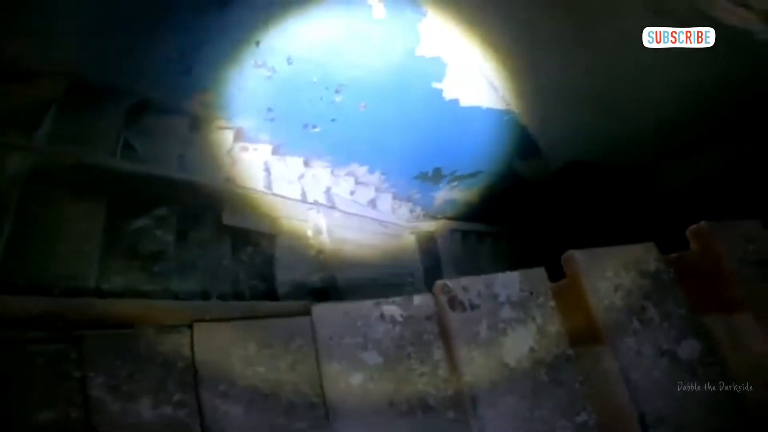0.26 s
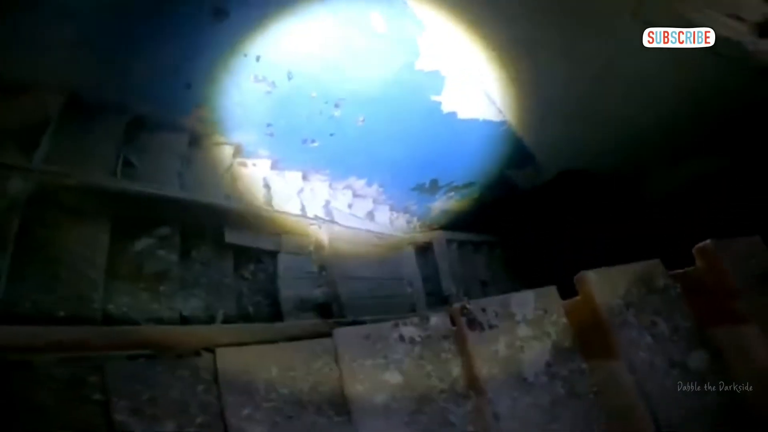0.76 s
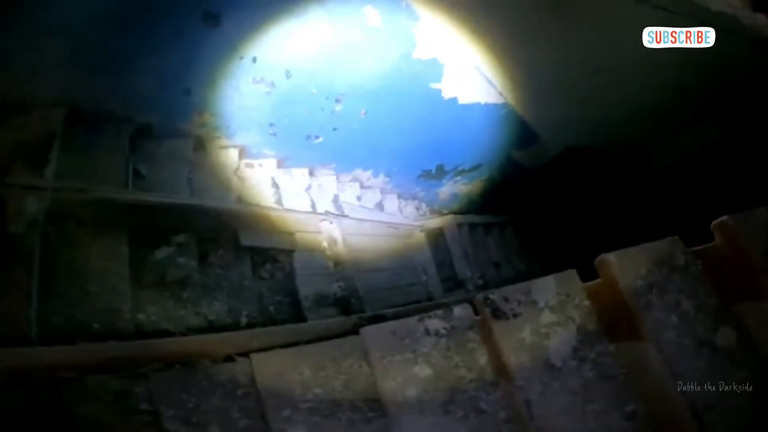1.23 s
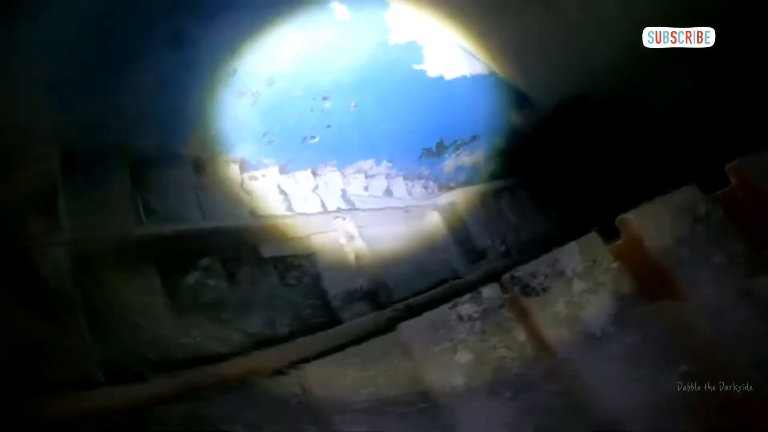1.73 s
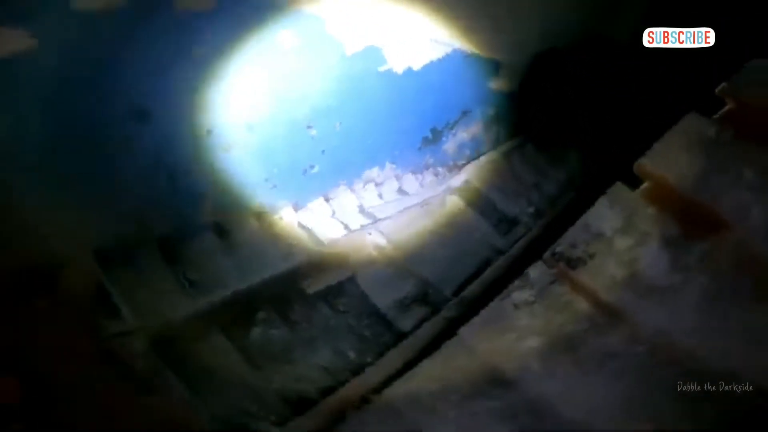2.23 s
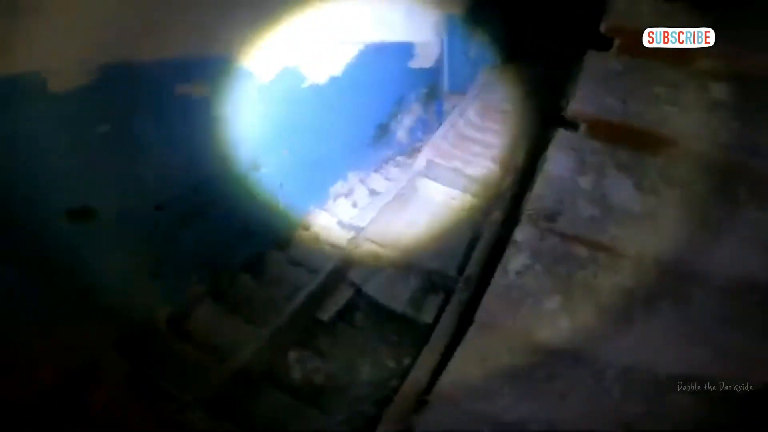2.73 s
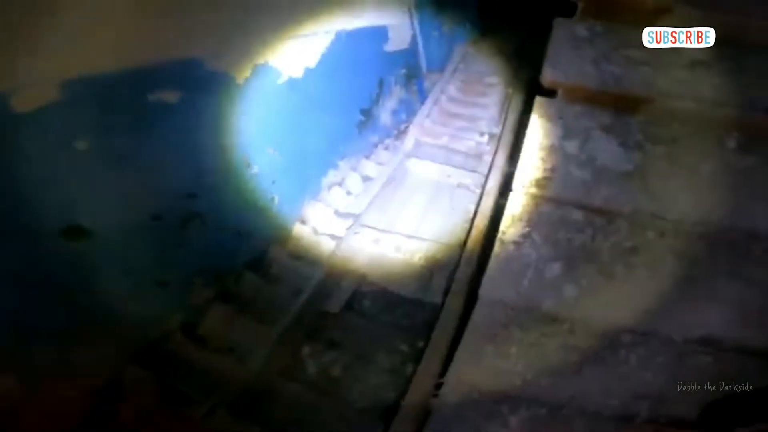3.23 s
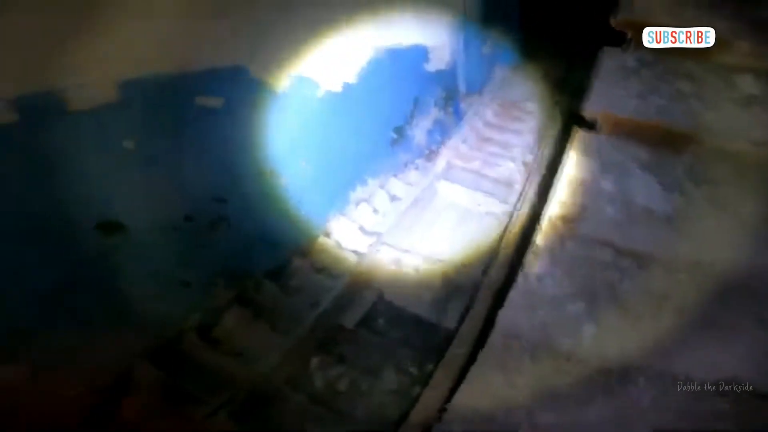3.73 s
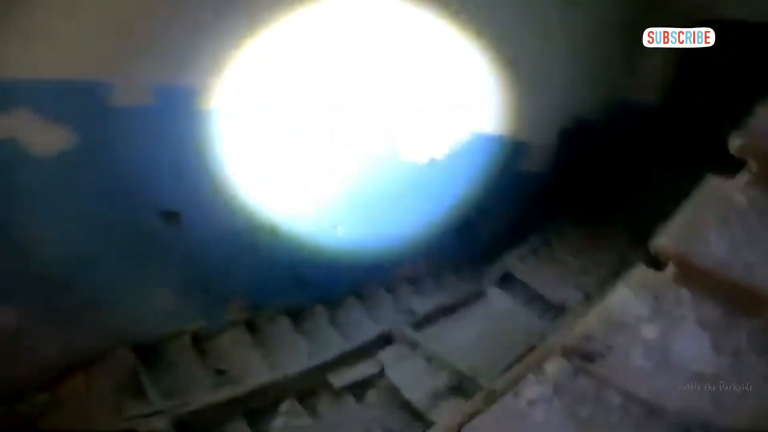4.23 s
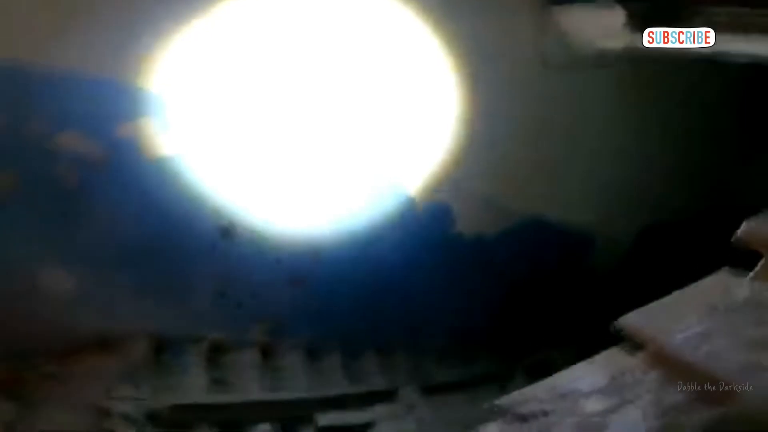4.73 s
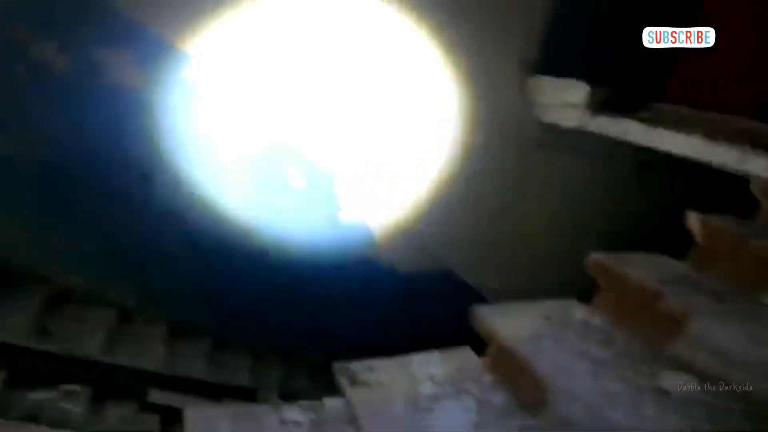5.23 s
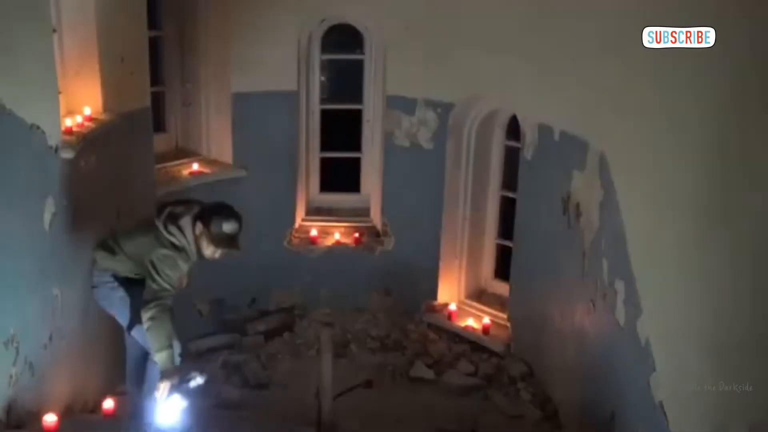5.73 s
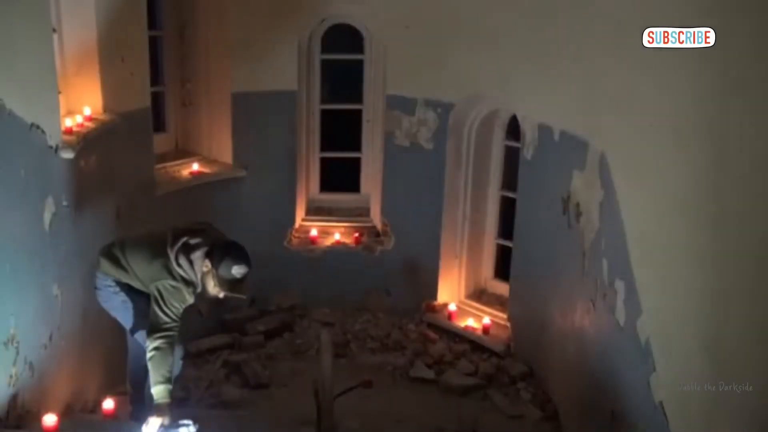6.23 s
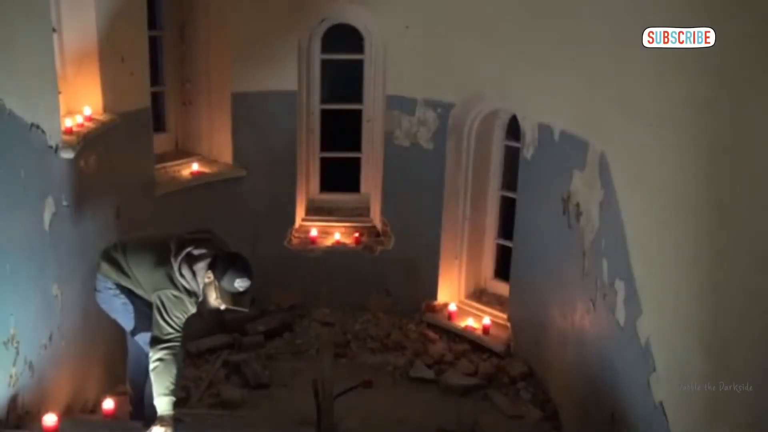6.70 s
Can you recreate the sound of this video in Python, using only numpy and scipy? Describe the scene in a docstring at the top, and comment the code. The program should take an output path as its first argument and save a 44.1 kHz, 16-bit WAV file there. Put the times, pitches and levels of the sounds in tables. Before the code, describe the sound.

Someone walks carefully over plaster and brick debris, with a handheld camera picking up dull body thumps. The start is hushed, with stony clacks and thin airy whistles; the middle becomes busy with brittle snaps, grating and a strong gritty skid with a short stairwell reverb. After a quieter gap, very loud distorted handling blows, metallic chatter and rubbing finish abruptly close to the microphone.

```python
"""Still air hums faintly in a bare ruined stairwell as soles rub over dust and faint whistling tones glide.
Someone carrying a camera picks a way over rubble: brick clacks, footfalls thump through the camera body,
grit snaps, short hollow knocks sound; a sole grates on plaster, the camera sways, then a sole slides.
At the end heavy bumps jolt the camera: a metal fitting rattles, a hand drags, judders and catches on the
shell, and the microphone overloads. Sources are shaped noise, random fractures and decaying modes."""
import sys
import numpy as np
from scipy import signal
from scipy.fft import rfft, irfft, next_fast_len
from scipy.io import wavfile
from scipy.ndimage import uniform_filter1d

SR = 44100
rng = np.random.default_rng(int(sys.argv[2]) if len(sys.argv) > 2 else 0)


def generate_wav(sig):
    """Save sig (samples, or channels by samples) to the path in sys.argv[1] as 16-bit PCM at SR."""
    pcm = np.round(np.clip(np.atleast_2d(sig).T, -1, 1) * 32767).astype(np.int16)
    wavfile.write(sys.argv[1], SR, pcm)


N = 306936
TIME = np.arange(N) / SR  # the whole scene [s]
HIT = np.arange(SR // 2) / SR  # a single hit [s]


def amp(db):
    """Level definition: decibels to amplitude gain."""
    return np.exp(np.asarray(db) * np.log(10) / 20)


def unit(x):
    """Power normalization: scales to rms 1."""
    return x / np.sqrt(np.mean(x ** 2) + 1e-20)


def crest(x):
    """Short-time power normalization: the loudest 3 ms of a hit get rms 1."""
    power = uniform_filter1d(x ** 2, size=132, mode="constant")
    return x / np.sqrt(power.max() + 1e-20)


def read(points, hz):
    """Interpolation of a spectrum along a log-frequency axis."""
    f, value = np.transpose(points)
    return np.interp(np.log(hz + 1), np.log(f + 1), value)


def add(mix, s, sound):
    """Superposition: mixes a sound in at time s."""
    part = mix[max(round(s * SR), 0):][:len(sound)]
    part += sound[:len(part)]


def colour(x, points):
    """Minimum-phase filtering: a causal filter whose phase follows from the log gain."""
    size = next_fast_len(len(x) + SR // 10)
    hz = abs(np.fft.fftfreq(size, 1 / SR))
    log_gain = np.log(amp(np.maximum(read(points, hz), -100)))
    response = np.exp(np.conj(signal.hilbert(log_gain)))[:size // 2 + 1]
    return irfft(rfft(x, size) * response, size)[:len(x)]


def dying(t60):
    """Exponential damping: falls 60 dB in t60, at least 1 ms."""
    return np.exp(-np.log(1000) * HIT / max(t60, 1e-3))


def swell(s, hold_s, rise_s, fall_s):
    """Exponential growth and decay: full from s for hold_s; rise_s and fall_s each cover 20 dB."""
    early = np.maximum(s - TIME, 0) / max(rise_s, 1e-3)
    late = np.maximum(TIME - s - hold_s, 0) / max(fall_s, 1e-3)
    return 10 ** -np.minimum(early + late, 10)


def burst(t60):
    """Damped random excitation: a puff of noise that dies away."""
    return rng.standard_normal(len(HIT)) * dying(t60)


def waver(length, size):
    """Slow random modulation of rms 1, smoothed twice over size samples."""
    smooth = uniform_filter1d(rng.standard_normal(length), size)
    return unit(uniform_filter1d(smooth, size))


def ring(x, hz, q):
    """Resonance: one peak filter, pitch capped at a third of the sample rate, q raised for high pitches."""
    hz = min(hz, SR / 3)
    return signal.lfilter(*signal.iirpeak(hz, max(q, 3 * hz / SR), fs=SR), x)


def patchy(x, depth_db):
    """Spectral modulation: patches of the spectrum grow and fade at random."""
    z = signal.stft(x, nperseg=512)[2]
    across_pitch = uniform_filter1d(rng.standard_normal(z.shape), size=7, axis=0)
    patches = unit(uniform_filter1d(across_pitch, size=12, axis=1))
    return unit(signal.istft(z * amp(depth_db * patches))[1][:N])


def grains(per_s, spread_db, dust):
    """Random fracture: tiny impulses of uneven size over a smooth hiss of dust."""
    size = amp(spread_db * np.minimum(rng.exponential(1, N), 4))
    clicks = size * rng.choice([-1, 1], N) * (rng.random(N) < per_s / SR)
    return unit(clicks) + dust * rng.standard_normal(N)


def chips(per_s, spread_db, q, count=18):
    """Random fracture with resonance: uneven fragments crack at random over a row of pitches."""
    out = np.zeros(N)
    for hz in np.geomspace(500, 13000, count):
        draw = rng.random(N) * SR * count / per_s
        at = np.flatnonzero(draw < 1)
        clicks = np.zeros(N)
        clicks[at] = amp(spread_db * np.minimum(-np.log(draw[at]), 4))
        out += ring(clicks, hz, q)
    return unit(out)


def glides(rows, fringe=1.6, fringe_db=-11):
    """Frequency-shifted narrow-band noise: hiss swells, glides and fades; pitch and level flutter."""
    flutter_share, flutter_db = 0.25, 1  # pitch flutter as a share of the band width; level flutter
    out = np.zeros(N)
    for s, length, first_hz, last_hz, width_hz, db in rows:
        part = np.minimum(TIME[:SR] / length, 1)
        noise = rng.standard_normal(SR) + 1j * rng.standard_normal(SR)
        hz = first_hz + (last_hz - first_hz) * part
        hz = hz + flutter_share * width_hz * waver(SR, size=900)
        core, halo = (signal.lfilter(*signal.butter(2, w, fs=SR), noise) / np.sqrt(w)
                      for w in (width_hz, fringe * width_hz))
        carrier = np.exp(2j * np.pi * np.cumsum(hz) / SR)
        hiss = ((core + amp(fringe_db) * halo) * carrier).real
        hiss = unit(hiss * amp(flutter_db * waver(SR, size=800)))
        envelope = np.sqrt(abs(np.sin(np.pi * part))) * (1 - part / 2)
        add(out, s, amp(db) * envelope * hiss)
    return out


# spectrum of the hush: (frequency [Hz], level [dB])
AIR_COLOUR = [(12, -65), (20, 3), (58, -1.5), (112, -21.5), (180, -11.5), (289, -13), (452, -18),
              (767, -23), (1270, -16.5), (2540, -27), (5380, -24), (7730, -29.5), (15500, -52.5)]


def air():
    """Background noise and cavity resonance: a wavering hush with a low hollow tone."""
    hush = patchy(colour(rng.standard_normal(N), AIR_COLOUR), depth_db=1.5)
    hollow = unit(ring(ring(rng.standard_normal(N), hz=171, q=1.77), hz=171, q=1.77))
    hollow *= amp(2 * waver(N, size=3500))
    return amp(-55.5) * hush + amp(-57.5) * hollow


# strokes of a sole over dust and grit:
# (peak time [s], rise per 20 dB [s], fall per 20 dB [s], coarse rub level [dB], fine grit level [dB])
STROKES = [(0.02, 0.38, 0.36, -51.5, -56), (2.23, 0.011, 0.34, -45, -44), (2.67, 0.0067, 0.41, -63, -53),
           (3.9, 0.18, 0.8, -49.5, -49.5), (4.07, 0.39, 0.11, -52, -51.5), (4.19, 0.19, 0.13, -69, -39.5),
           (4.68, 0.16, 0.11, -50, -47), (4.87, 0.8, 0.29, -41.5, -50), (5.021, 0.21, 0.93, -41, -45.5),
           (5.43, 0.13, 0.47, -51, -53), (5.698, 0.078, 0.11, -42, -42.5), (6.05, 0.3, 0.37, -53, -57.5),
           (6.341, 0.43, 0.36, -52, -56.5)]
# spectrum of the coarse rub: (frequency [Hz], level [dB])
RUB_COLOUR = [(120, -58), (200, 0), (377, -7), (580, -7.5), (842, -11), (1190, -2), (2020, -7.5),
              (3500, -20.5), (4550, -39), (7700, -120)]
# spectrum of the fine grit: (frequency [Hz], level [dB])
GRIT_COLOUR = [(1290, -17), (2200, -1.5), (4600, 0), (5820, -4), (7500, -4), (9700, -13), (10800, -14.5),
               (15500, -26)]
# plaster crushed to powder: (peak time [s], rise per 20 dB [s], fall per 20 dB [s], level [dB])
POWDER_HISSES = [(4.19, 0.23, 0.16, -62), (5.708, 0.055, 0.041, -48.5)]


def shuffles():
    """Sliding friction: soles rub over dust, fine grit crackles under them and crushed powder hisses."""
    rub = unit(colour(rng.standard_normal(N), RUB_COLOUR))
    grit = patchy(colour(grains(per_s=900, spread_db=4.2, dust=1.1), GRIT_COLOUR), depth_db=1.5)
    rub_power, grit_power = np.zeros((2, N))
    for s, rise_s, fall_s, rub_db, grit_db in STROKES:
        stroke = swell(s, 0, rise_s, fall_s)
        rub_power += (amp(rub_db) * stroke) ** 2
        grit_power += (amp(grit_db) * stroke) ** 2
    fizz = unit(ring(ring(rng.standard_normal(N), hz=9400, q=1.2), hz=9400, q=1.2))
    powder = sum(amp(db) * swell(s, 0, rise_s, fall_s) for s, rise_s, fall_s, db in POWDER_HISSES)
    return rub * np.sqrt(rub_power) + grit * np.sqrt(grit_power) + powder * fizz


# faint thin whistling tones, level before the swell and fade:
# (time [s], length [s], first pitch [Hz], last pitch [Hz], band width [Hz], level [dB])
WHISTLE_GLIDES = [(.22, 0.44, 7330, 7050, 129, -68), (.73, 0.2, 6220, 5300, 282, -59.5),
                  (.86, 0.24, 5900, 5760, 170, -61), (0.99, 0.15, 5580, 5230, 120, -52.5),
                  (1.05, 0.14, 5420, 4420, 230, -50.5), (1.16, 0.31, 3970, 3740, 170, -53),
                  (1.34, 0.42, 3330, 3180, 70, -55), (1.38, 0.5, 4350, 4530, 149, -61),
                  (1.89, 0.19, 5150, 4950, 262, -59), (2.01, 0.68, 5430, 5650, 145, -56.5),
                  (2.42, 0.18, 4170, 4000, 110, -55), (2.415, 0.12, 3700, 3400, 190, -51.5),
                  (2.88, 0.28, 4460, 4240, 100, -61), (3.19, 0.21, 2900, 3200, 119, -61),
                  (3.204, 0.26, 4630, 4980, 548, -58), (5.6, 0.29, 5180, 4970, 200, -54)]


def whistles():
    """Narrow-band noise: faint thin whistling tones glide and fade."""
    return glides(WHISTLE_GLIDES)


# brick pieces clacking some way off: (time [s], level [dB])
BRICK_CLACKS = [(1.223, -34.5), (1.261, -36), (1.369, -35.5), (1.477, -34), (2.225, -33), (2.3, -35),
                (2.969, -32), (3.031, -34.5), (3.066, -43)]
# spectrum of a clack: (frequency [Hz], level [dB])
BRICK_COLOUR = [(120, -24), (200, -6.5), (570, 0), (818, -2.5), (1110, -5), (1850, -6), (2170, -3),
                (3010, -9), (3350, -6), (5450, -12), (7550, -9), (8260, -16.5), (13000, -20), (15000, -28)]


def clacks():
    """Impact: brick tips onto brick with a burst of contact, a short stony resonance and settling crumbs."""
    out = np.zeros(N)
    loose = grains(per_s=110, spread_db=2.5, dust=.35)
    for s, db in BRICK_CLACKS:
        crumbs = amp(-14.5) * loose[rng.integers(N - len(HIT)):][:len(HIT)] * dying(t60=0.64)
        contact = burst(t60=0.057) * (1 - np.exp(-HIT / 0.00069))
        contact = contact + 2.85 * ring(contact, hz=1120 * rng.uniform(1.0, 1.03), q=5.6)
        contact += colour(crumbs, [(400, 3.5), (1300, -1), (3500, -28.0)])
        add(out, s, amp(db) * crest(colour(contact, BRICK_COLOUR)))
    return out


# footfalls that reach the camera body: (time [s], peak level [dB], length of the push [s])
FOOTFALLS = [(2.288, -23.5, 0.0013), (2.299, -25.5, 0.016), (3.174, -24, 0.0021), (4.135, -30.5, 0.0023),
             (4.276, -13.5, 0.0091), (4.546, -28, 0.0023), (4.604, -19, 0.00089), (4.611, -14.5, 0.0066),
             (4.657, -13.5, 0.0031), (4.687, -14, 0.011), (4.823, -19.5, 0.013), (5.041, -16.5, 0.0081),
             (5.267, -25, 0.00088), (5.666, -23.5, 0.0008), (5.737, -27, 0.014), (6.128, -22.5, 0.015),
             (6.255, -23, 0.014)]
# low modes of the camera body: (frequency [Hz], level [dB], t60 [s])
BODY_MODES = [(45.2, -6, 0.49), (75.8, 6.5, 0.22), (129, 0.5, 0.24), (233, 2, 0.03), (301, 2, 0.094),
              (610, -8, 0.065)]


def thumps():
    """Modal excitation: a smooth push rings the camera body; shorter pushes sound harder."""
    out = np.zeros(N)
    modes = sum(amp(mode_db) * dying(t60) * np.cos(2 * np.pi * hz * HIT)
                for hz, mode_db, t60 in BODY_MODES)
    for s, db, push_s in FOOTFALLS:
        u = HIT / (max(push_s, 1e-3) / 4)
        thump = signal.fftconvolve(-u * np.exp(-u), modes)[:len(HIT)]
        add(out, s, amp(db) * thump / abs(thump).max())
    return out


# grit snapping close by, splinter treble relative to the main crack:
# (time [s], level [dB], pitch [Hz], band width [octaves], splinter treble [dB])
GRIT_SNAPS = [(2.3018, -33.5, 4400, 0.65, -18), (2.3795, -27, 3970, 0.79, -32),
              (2.6656, -36.5, 3470, 1.25, -26), (3.9899, -34.5, 4200, 1, -5),
              (4.0753, -33, 3270, 0.83, -24), (4.139, -28, 5950, 0.73, -20), (4.1655, -41, 4060, 1.1, -16),
              (4.1792, -33.5, 3850, 1.5, -13), (4.1882, -33.5, 2600, 1.9, -9),
              (4.2042, -29, 4630, 0.96, -6), (4.208, -31, 4550, .9, -3), (4.233, -35, 3600, 1.3, -18),
              (4.2672, -15, 3760, 0.65, -8), (4.268, -18.5, 1850, 0.42, -35), (4.2922, -40, 9400, .6, -20),
              (4.6026, -24, 1950, 0.29, -4), (4.651, -38.5, 3960, 1.3, -3), (4.6668, -34, 2960, 0.75, -6),
              (4.675, -30, 1420, 1, -28), (4.7232, -31.5, 1890, 0.71, -16), (4.7889, -24, 1430, 1.1, -11.5),
              (4.975, -33, 2940, 0.84, 14), (4.9878, -32.5, 2570, 0.81, 5), (5.0288, -22.5, 3300, 0.82, 7),
              (5.033, -23.5, 2090, 1.2, -14), (5.037, -29, 9000, 0.55, -8), (5.1, -22.5, 3400, 1.2, -9),
              (5.1363, -23.5, 4600, 1.1, -11), (6.0713, -40.5, 2260, 0.97, -20)]


def snaps(fracture_s=0.000901):
    """Brittle fracture: plaster creaks briefly, then cracks in a band of its own with tiny splinters."""
    out = np.zeros(N)
    for s, db, hz, octaves, treble_db in GRIT_SNAPS:
        crack = burst(t60=0.0091) * (1 - np.exp(-HIT / 0.00047))
        crack = crack[:SR // 20]
        add(crack, fracture_s, np.array([6.]))  # the break itself
        half = 2 ** (np.clip(octaves, .1, 3) / 2)
        band = [hz / half, min(hz * half, SR / 3)]
        body = signal.lfilter(*signal.butter(2, band, "band", fs=SR), crack)
        splinters = colour(crack, [(500, -3), (4000, 5.5), (9000, 7.0), (15000, -8.5)])
        add(out, s, amp(db) * crest(crest(body) + amp(treble_db) * crest(splinters)))
    return out


# short hollow knocks, some under a snap or a camera blow:
# (time [s], level [dB], pitch [Hz], room share [dB])
HOLLOW_KNOCKS = [(2.888, -42.5, 342, -22), (4.268, -24, 950, -27), (4.6035, -34.5, 696, -25),
                 (4.766, -29.5, 1090, 5.5), (4.776, -24, 1230, -2), (4.789, -21.5, 1250, -4.5),
                 (4.799, -25.5, 1120, -2), (5.479, -27, 1180, -13), (5.493, -26, 1280, -5.5),
                 (5.639, -26, 1420, -7.5), (5.643, -30, 546, -7), (5.69, -32, 632, -2.5),
                 (5.835, -39, 1130, -2), (6.52, -13.5, 1450, -15), (6.531, -16.5, 1550, -16)]


def knocks():
    """Impact and resonance: a tap and short ringing noise. Returns direct sound and room send."""
    out, sent = np.zeros((2, N))
    for s, db, hz, wet_db in HOLLOW_KNOCKS:
        blow = burst(t60=0.033)
        add(blow, .001, np.array([7.]))  # the tap
        tone = ring(blow, hz, q=5.5) + 0.22 * ring(blow, hz=1500, q=28) + 0.18 * ring(blow, hz=644, q=1.8)
        body = colour(tone, [(150, 9.5), (400, 0.0), (1900, -4.0), (3200, -11.5), (8000, -13), (15000, -33)])
        knock = amp(db) * crest(body)
        add(out, s, knock)
        add(sent, s, amp(wet_db) * knock)
    return out, sent


# the edge of a sole on plaster, level before the swell and fade:
# (time [s], length [s], first pitch [Hz], last pitch [Hz], band width [Hz], level [dB])
SOLE_GRATES = [(3.95, 0.2, 1154, 1365, 149, -48.5), (4.03, 0.18, 1500, 2000, 264, -48),
               (4.04, 0.09, 2610, 2530, 100, -48), (5.06, 0.17, 2396, 1101, 326, -30.5)]


def grates():
    """Frictional excitation: a sole edge grates over plaster, its pitch moving with the stroke."""
    return glides(SOLE_GRATES)


# spectrum of the sway: (frequency [Hz], level [dB])
SWAY_RUMBLE = [(12, -52), (20, 5.5), (52, 0), (102, -11), (348, -18.5), (650, -35.5), (1100, -120)]


def sway():
    """Low-frequency vibration: rumble of the carried camera builds up and dies down with the walk."""
    level = amp(-38) * swell(4.65, hold_s=0.5, rise_s=0.35, fall_s=1.68)
    return level * unit(colour(rng.standard_normal(N), SWAY_RUMBLE))


# spectrum of the crushed grains: (frequency [Hz], level [dB])
SLIDE_CRUSH = [(120, -31), (200, -3), (278, -3), (544, -1.5), (783, -1.5), (2150, 0.5), (3070, -3),
               (4580, -3), (5800, -5), (9800, -3), (11000, -14), (15000, -25)]


def slide(start_s=5.029, bite_s=0.0024, press_s=5.087, press_db_per_s=68):
    """Crushing friction: a sole bites, presses to full weight and eases; fine grit fades first."""
    coarse = chips(per_s=1200, spread_db=2.4, q=7)
    crush = colour(unit(grains(per_s=3600, spread_db=3, dust=0.2)) + 1.3 * coarse, SLIDE_CRUSH)
    crush *= amp(1.7 * waver(N, size=110))  # uneven surges
    fine = signal.sosfiltfilt(signal.butter(2, 5500, "high", fs=SR, output="sos"), crush)
    weight = amp(-press_db_per_s * np.maximum(press_s - TIME, 0))
    coarse_level = amp(-27) * swell(start_s, hold_s=0.16, rise_s=bite_s, fall_s=0.092)
    fine_level = amp(-29.5) * swell(start_s, hold_s=0.083, rise_s=bite_s, fall_s=0.11)
    return weight * (coarse_level * unit(crush - fine) + fine_level * unit(fine))


# the camera is jostled: (time [s], length [s], level [dB])
CAMERA_JOSTLES = [(6.521, 0.089, -14), (6.748, 0.04, -12.5), (6.855, 0.063, -11)]
# spectrum of the jostling: (frequency [Hz], level [dB])
JOSTLE_BUMPS = [(15, -33), (25, -11), (42, 4), (97, 0.5), (192, -7.5), (350, -6.5), (427, -15), (1350, -33),
                (2300, -29.5), (3140, -40), (6500, -60)]


def jostle():
    """Random low-frequency impulses: the hand jostles the camera."""
    level = sum(amp(db) * swell(s, length, rise_s=0.021, fall_s=0.076) for s, length, db in CAMERA_JOSTLES)
    return level * unit(colour(grains(per_s=220, spread_db=1.5, dust=.2), JOSTLE_BUMPS))


# modes of the metal fitting, before further damping and detuning: (frequency [Hz], level [dB], t60 [s])
FITTING_MODES = [(2200, -6, 0.0097), (5240, -10, 0.063), (5560, -12, 0.052), (5535, -2, 0.026),
                 (5980, 6, 0.035), (8620, -6, 0.034), (10340, -13, 0.04)]


def clink():
    """Modal ringing: a metal contact grinds on grit, chatters and rings slightly varied modes."""
    modes = np.zeros(len(HIT))
    for hz, mode_db, t60 in FITTING_MODES:
        level = amp(mode_db + 0.56 * rng.standard_normal())
        cycles = hz * rng.normal(1, 0.011) * HIT
        modes += level * dying(t60) * np.sin(2 * np.pi * (cycles + rng.random()))
    chatter = signal.fftconvolve(modes, burst(t60=0.03))[:len(HIT)]
    grit = uniform_filter1d(burst(t60=0.076) * rng.exponential(1, len(HIT)), size=2)
    grind = ring(grit, hz=7540, q=2.2)
    metal = crest(modes) + 0.46 * crest(chatter) + 0.22 * crest(grind)
    metal *= 1 - np.exp(-HIT / 0.00021)
    return crest(metal * dying(t60=0.37))


# the fitting is thrown against its seat, level of the first contact: (time [s], level [dB])
FITTING_THROWS = [(6.5178, -7), (6.547, -13.5), (6.562, -9), (6.5675, -8), (6.587, -15.5), (6.599, -15.5),
                  (6.606, -17), (6.615, -21.5), (6.626, -22), (6.6338, -22), (6.7155, -26.5), (6.738, -12),
                  (6.7585, -9)]


def rattle(count=3, rebound_s=.0045, rebound_db=-9.5):
    """Repeated impact: each throw of the fitting is a contact and its quick, weakening rebounds."""
    out = np.zeros(N)
    for s, db in FITTING_THROWS:
        for k in range(count):
            add(out, s + k * rebound_s, amp(db + k * rebound_db) * clink())
    return out


# blows straight on the camera: (time [s], thud level [dB], thud t60 [s], starting pitch [Hz])
CAMERA_BLOWS = [(6.521, 5.5, 0.18, 428), (6.548, 2, 0.036, 562), (6.591, -3, 0.18, 420),
                (6.608, -11, 0.087, 450), (6.634, -1, 0.044, 679), (6.716, -2.5, 0.2, 473),
                (6.739, 0.5, 0.071, 624.6), (6.768, -6, 0.063, 566), (6.79, -3, 0.057, 530),
                (6.824, -6.5, 0.02, 577), (6.842, -10, .03, 417), (6.858, -4, 0.028, 500)]


def jolts(low_hz=70, spread_s=0.00491, flex_hz=48):
    """Bending-wave dispersion: high waves arrive first, so the thud sinks; spot knocks and grip flexes."""
    out = np.zeros(N)
    for s, db, t60, first_hz in CAMERA_BLOWS:
        hz = low_hz + (first_hz - low_hz) * np.exp(-HIT / spread_s)
        thud = np.sin(2 * np.pi * np.cumsum(hz) / SR) * dying(t60) * (1 - np.exp(-HIT / 0.0031))
        flex = np.sin(2 * np.pi * flex_hz * HIT) * dying(2 * t60)
        spot = np.sin(2 * np.pi * first_hz * HIT) * dying(t60=0.077)
        slap = colour(burst(t60=0.028), [(300, 10.0), (700, 4.0), (1200, -9.0), (3500, -18.5), (14000, -35)])
        blow = thud + amp(-21.5) * flex + amp(-18.5) * spot + amp(-17.0) * crest(slap)
        add(out, s, amp(db) * blow)
    return out


# resonances of the shell under the hand, for drag and slips: (frequency [Hz], level [dB])
SHELL_COLOUR = [(350, -26), (600, -1.5), (950, 0), (1400, -13.5), (2000, -2.5), (2700, -12.5),
                (3250, -19.5), (3950, -8), (4400, -12.5), (5150, -6.5), (6100, -18), (6750, -10),
                (7900, -26), (8800, -22), (9700, -28.5), (15500, -37)]


def drag():
    """Frictional excitation: the hand's rubbing over the camera shell swells once and fades."""
    level = amp(-21) * swell(6.895, hold_s=0.044, rise_s=0.082, fall_s=0.05)
    return level * unit(colour(grains(per_s=1500, spread_db=2, dust=.5), SHELL_COLOUR))


# the grip judders as it slips: (time [s], length [s], level [dB])
GRIP_JUDDERS = [(6.88, 0.0386, -5), (6.953, .01, -4.5)]


def judder():
    """Stick-slip oscillation: the slipping grip judders at a low, wandering pitch."""
    level = sum(amp(db) * swell(s, length, rise_s=0.038, fall_s=0.0064) for s, length, db in GRIP_JUDDERS)
    wander = unit(uniform_filter1d(rng.standard_normal(N), size=600))
    hz = 147.5 * (1 + 0.0664 * wander)
    return level * np.sin(2 * np.pi * np.cumsum(hz) / SR)


# catches of the hand: (time [s], level [dB], strongest resonance [Hz], noise burst t60 [s])
HAND_SLIPS = [(6.8465, -31, 2100, .03), (6.8525, -13, 2150, 0.048), (6.897, -14, 5300, .02),
              (6.9209, -7.5, 1970, 0.018), (6.9349, -19, 4900, 0.03), (6.940, -12, 4800, 0.018)]


def slips():
    """Stick-slip: each catch rasps through the shell resonances; the spot touched favours one."""
    out = np.zeros(N)
    for s, db, hz, t60 in HAND_SLIPS:
        rasp = crest(colour(burst(t60) * (1 - np.exp(-HIT / 0.00065)), SHELL_COLOUR))
        add(out, s, amp(db) * crest(rasp + 0.35 * crest(ring(rasp, hz, q=8))))
    return out


# reverberation of the bare stairwell: (frequency [Hz], t60 [s])
ROOM_T60 = [(150, 0.39), (500, 0.78), (1200, 0.66), (3000, 0.54), (7000, 0.38), (14000, 0.29)]


def room(x):
    """Diffuse reverberation: bare plaster walls give a dense tail, longest in the middle pitches."""
    taps = rng.standard_normal(SR) * (1 - np.exp(-np.arange(SR) / SR / 0.00034))
    hz, t, z = signal.stft(taps, SR, nperseg=256)
    decay = np.exp(-np.log(1000) * t / read(ROOM_T60, hz)[:, None])
    tail = signal.istft(z * decay, SR, nperseg=256)[1]
    return signal.fftconvolve(x, tail / np.linalg.norm(tail))[:N]


def scene():
    """Direct and reverberant fields: all sources sound dry, and some also feed the stairwell."""
    scuff, clack, snap = shuffles(), clacks(), snaps()
    knock, knock_sent = knocks()
    skid, metal = slide(), rattle()
    sent = amp(-4.0) * clack + colour(snap, [(3500, -17.5), (8000, -11)]) + knock_sent
    sent += amp(-10.5) * skid + amp(-27.0) * metal
    rubble = scuff + clack + snap + grates() + skid
    handling = sway() + jostle() + drag() + judder() + slips()
    camera = thumps() + handling + metal + jolts()
    return (air() + whistles() + rubble + knock + camera + room(sent))[None]


def record(dry, ceiling=0.54, knee=5, shelf_hz=2500):
    """Soft saturation: the microphone rounds off peaks, with more treble headroom; then a band limit."""
    pole, zero = np.exp(-2 * np.pi * np.array([shelf_hz, 2 * shelf_hz]) / SR)
    b, a = np.array([1, -zero]) / (1 - zero), np.array([1, -pole]) / (1 - pole)
    dull = signal.lfilter(b, a, dry)
    flattened = dull / (1 + abs(dull / ceiling) ** knee) ** (1 / knee)
    clipped = signal.lfilter(a, b, flattened)  # undoes the treble cut
    band_limit = signal.firwin(201, 15150, window=("kaiser", 8), fs=SR)
    return signal.oaconvolve(clipped, band_limit[None], "same")


dry = scene()
out = record(dry)
generate_wav(out)
```